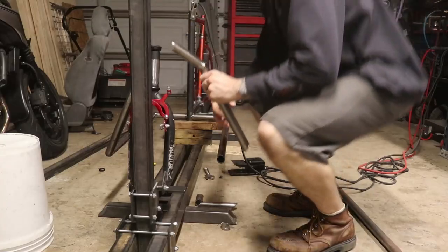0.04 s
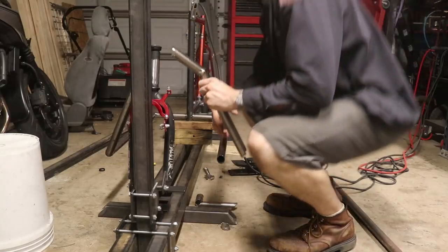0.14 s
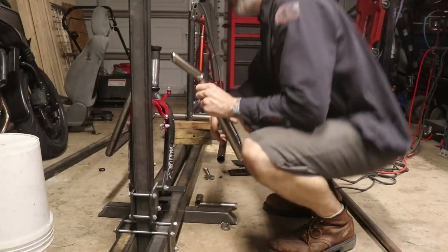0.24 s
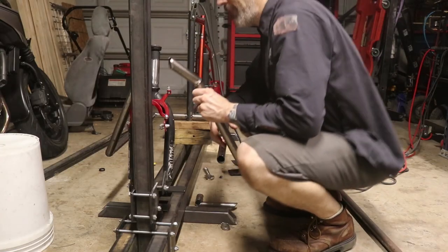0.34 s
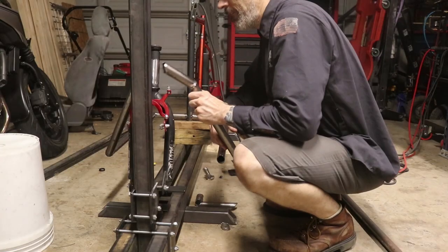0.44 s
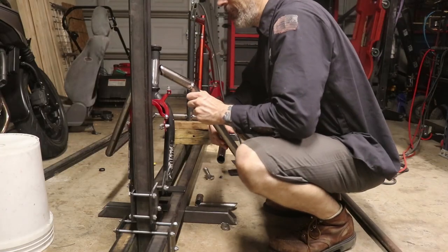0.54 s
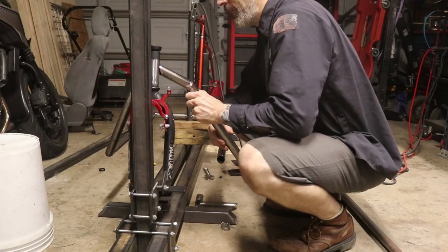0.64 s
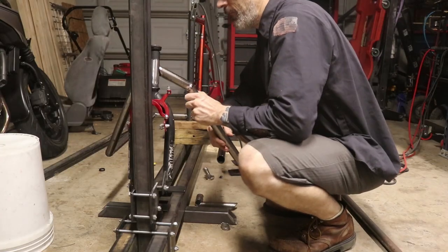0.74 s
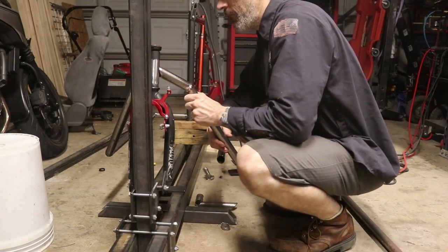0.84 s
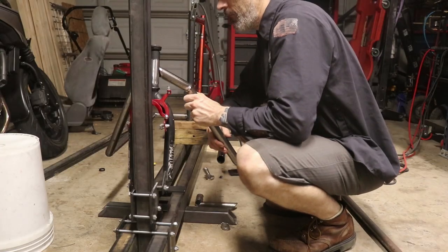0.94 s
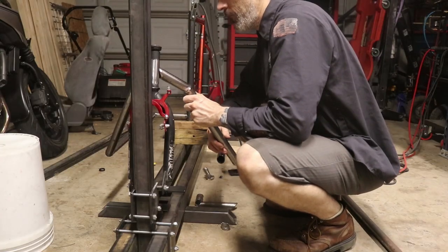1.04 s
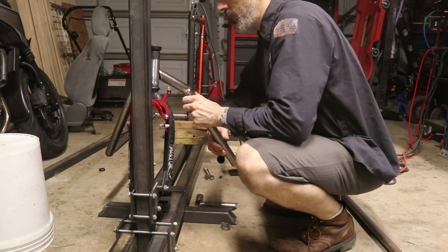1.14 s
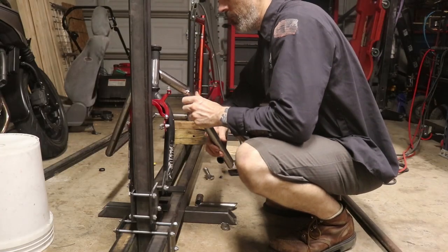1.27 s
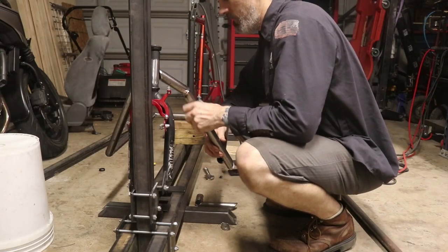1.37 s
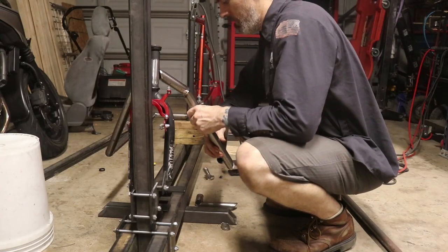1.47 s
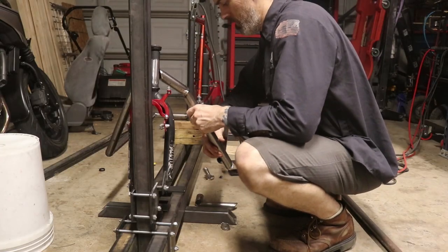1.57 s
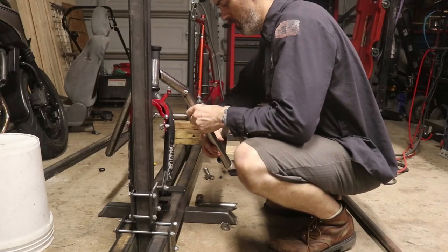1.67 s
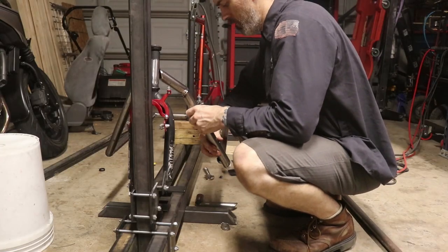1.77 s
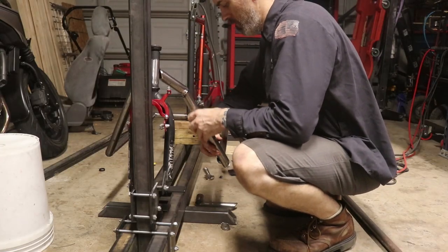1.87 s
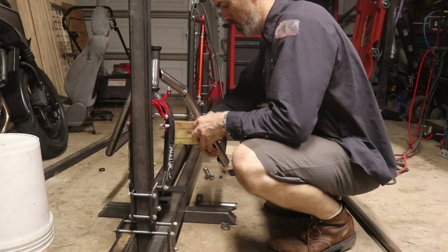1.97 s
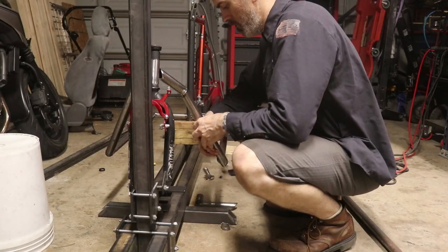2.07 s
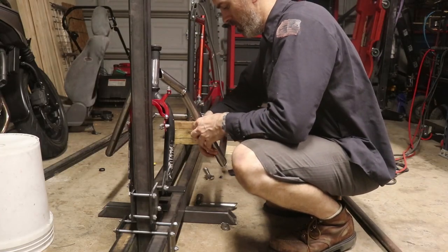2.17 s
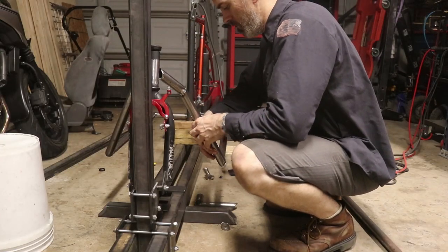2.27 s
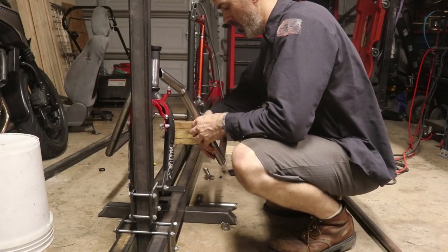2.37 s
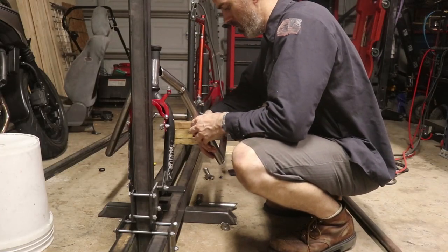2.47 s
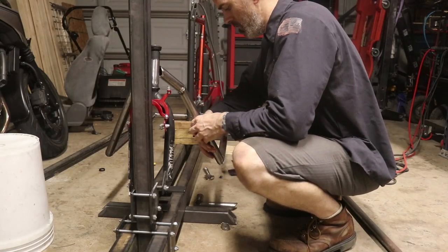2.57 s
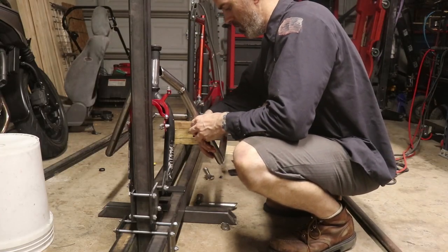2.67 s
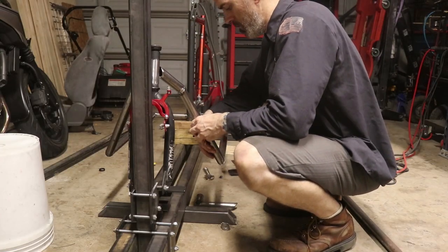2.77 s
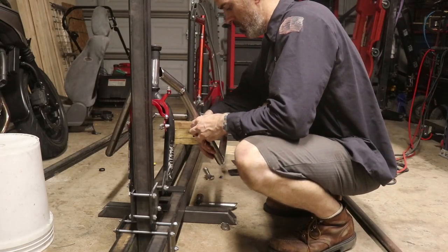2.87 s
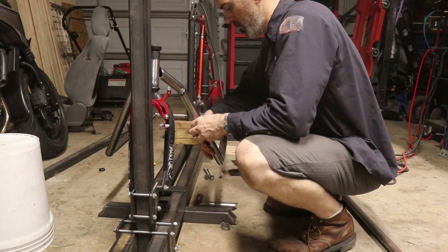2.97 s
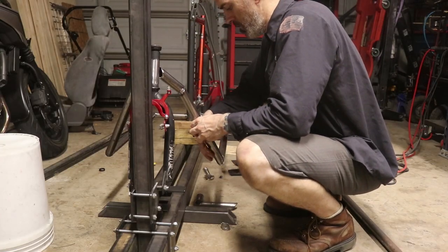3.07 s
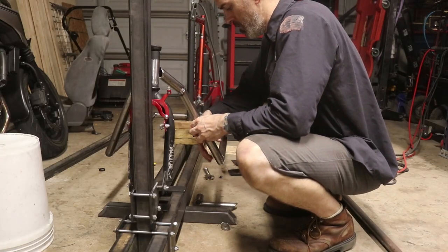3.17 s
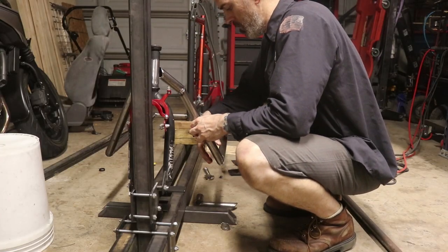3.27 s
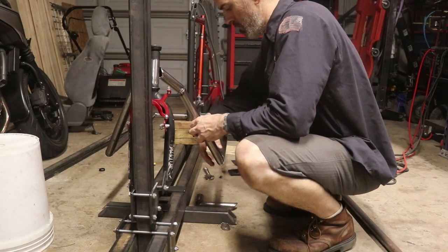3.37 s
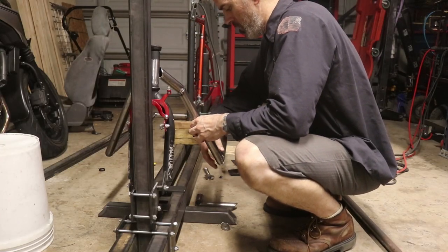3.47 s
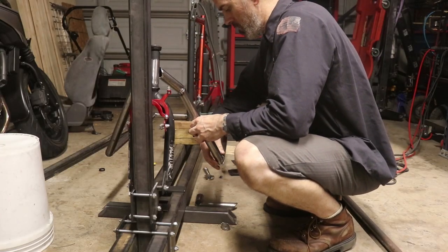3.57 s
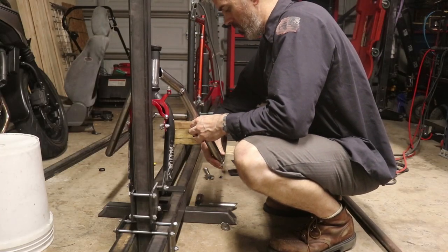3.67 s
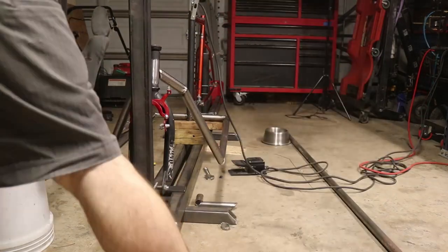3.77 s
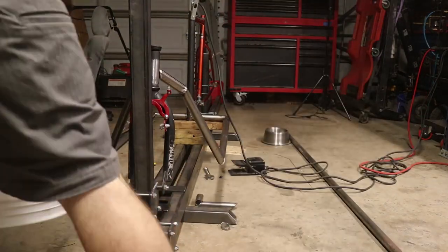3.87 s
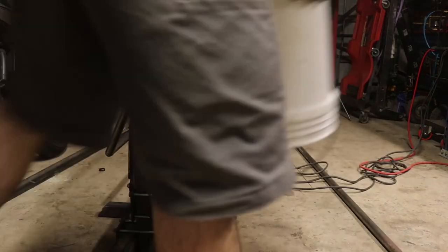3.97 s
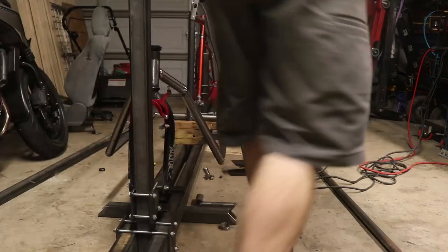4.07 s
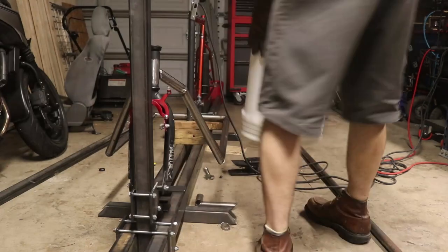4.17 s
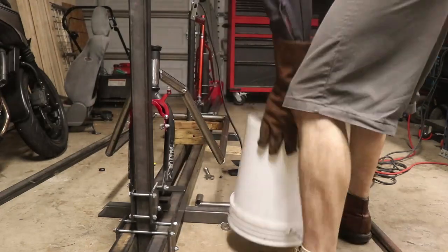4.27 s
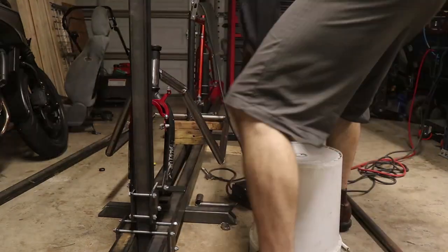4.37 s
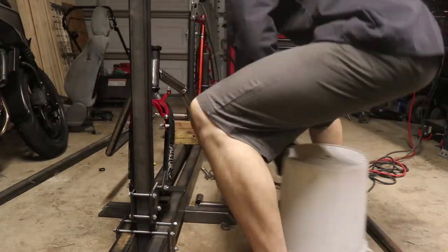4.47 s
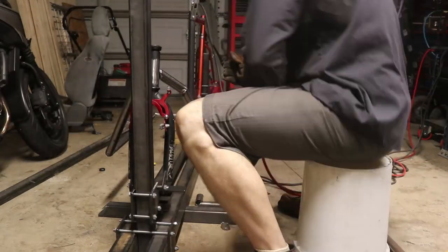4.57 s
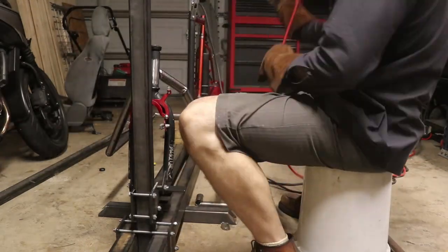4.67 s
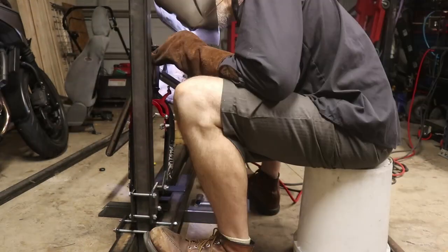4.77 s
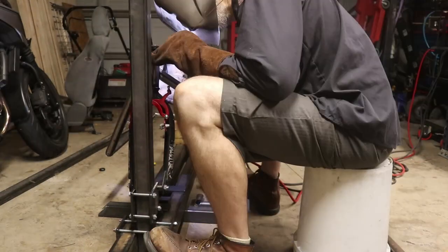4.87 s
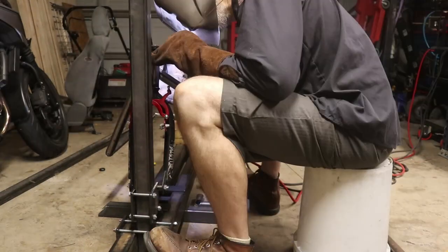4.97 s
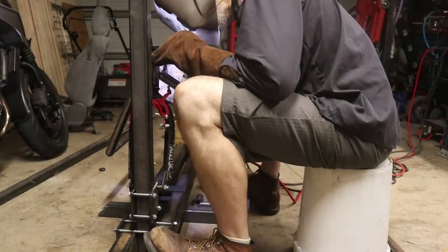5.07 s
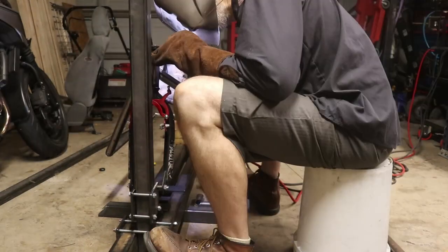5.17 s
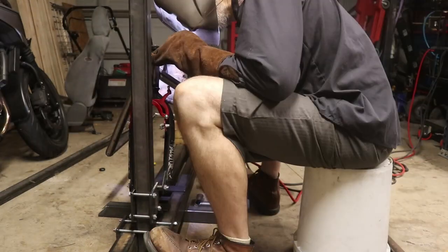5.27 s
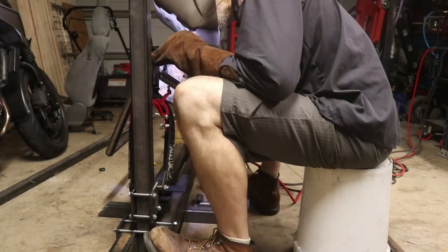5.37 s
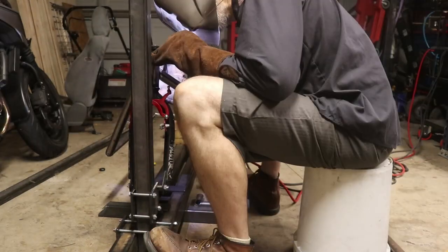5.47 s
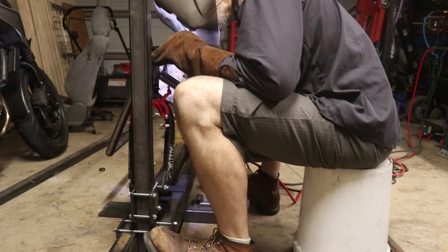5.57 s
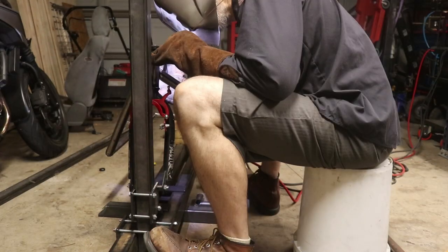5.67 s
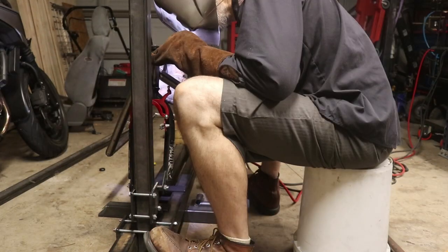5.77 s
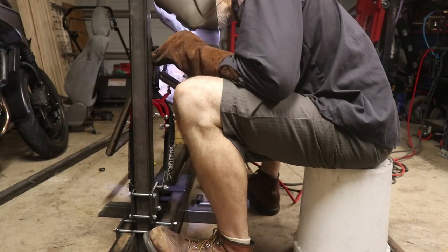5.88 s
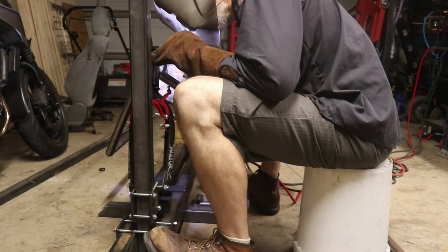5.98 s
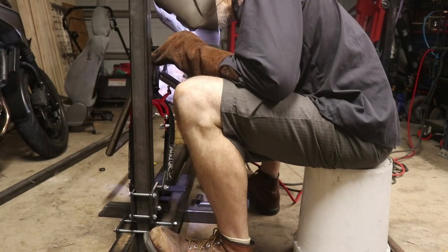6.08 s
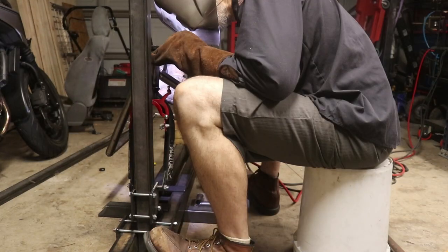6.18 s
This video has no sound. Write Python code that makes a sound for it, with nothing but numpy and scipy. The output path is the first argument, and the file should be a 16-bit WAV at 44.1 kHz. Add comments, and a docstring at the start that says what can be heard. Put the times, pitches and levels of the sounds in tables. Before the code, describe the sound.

Quiet garage air with faint hum. Sleeves rustle as a man crouches; a steel tube knocks hard on a frame, rings, scrapes briefly, then taps more softly. A hard cut brings a second of fast-forward: high fan whistle, short bumps, a plastic bucket juddering and booming. Another cut returns to normal speed, a low fan roar, and at the very end an arc spits and crackles. Camera microphone, mild room reverberation.

```python
"""Sleeves rustle in a still garage with faint mains hum; a steel tube knocks, slides and rings on a frame.
Then about a second runs in fast-forward, seven times as quick and as high: the welder's fan whistles
over bumps, and a plastic bucket is dragged over the concrete and set down.
Back at normal speed the fan roars on, and the arc strikes and crackles.
Noise is filtered into air, cloth, frame and sparks; decaying sines ring the tube and bucket."""
import sys
import numpy as np
from scipy import signal
from scipy.fft import rfft, irfft, next_fast_len
from scipy.io import wavfile
from scipy.ndimage import uniform_filter1d, map_coordinates

SR = 44100
rng = np.random.default_rng(int(sys.argv[2]) if len(sys.argv) > 2 else 0)


def generate_wav(sig):
    """Save sig (samples, or channels by samples) to the path in sys.argv[1] as 16-bit PCM at SR."""
    pcm = np.round(np.clip(np.atleast_2d(sig).T, -1, 1) * 32767).astype(np.int16)
    wavfile.write(sys.argv[1], SR, pcm)


N = 274302


def amp(db):
    """Decibels to gain."""
    return 10 ** (np.asarray(db) / 20)


def unit(x):
    """Scaled to rms 1."""
    return x / np.sqrt(np.mean(x ** 2) + 1e-20)


def clock():
    """The time of every sample in seconds."""
    return np.arange(N) / SR


def along(points, hz):
    """(Hz, value) points read on a log frequency axis."""
    f, v = np.transpose(points)
    return np.interp(np.log(hz + 1), np.log(f + 1), v)


def level(rows, outside=None):
    """Gain per sample from (s, dB) rows."""
    s, db = np.transpose(rows)
    return amp(np.interp(clock(), s, db, left=outside, right=outside))


def wobble(rate):
    """A smooth random curve with the given number of knots a second."""
    knots = rng.standard_normal(int(N * rate / SR) + 4)
    return map_coordinates(knots, [clock() * rate])


SWELL_SHAPE = 1.42  # 1 is a pointed peak, 2 a round one


def swell(s, db, rise_s, fall_s):
    """Gain of one stroke: it grows by 20 dB over its rise to a height at s, and loses 20 dB over its fall."""
    t = clock() - s
    span_s = np.where(t < 0, rise_s, fall_s)
    return amp(db - 20 * np.abs(t / span_s) ** SWELL_SHAPE)


def coloured(x, points, speed=1):
    """x through the causal minimum-phase filter with the given (Hz, dB) points, played at a speed."""
    m = 2 * next_fast_len(len(x) // 2 + 4096)
    hz = np.fft.rfftfreq(m, 1 / SR) / speed
    cepstrum = irfft(np.log(amp(along(points, hz))))
    # folding the cepstrum onto positive time makes the filter causal
    cepstrum[1:m // 2] *= 2
    cepstrum[m // 2 + 1:] = 0
    return irfft(rfft(x, m) * np.exp(rfft(cepstrum)), m)[:len(x)]


def grains(rate, spread_db):
    """Randomly timed tiny impulses of uneven size, about rate a second, rms 1."""
    sizes = rng.standard_normal(N) * amp(spread_db * np.clip(rng.standard_normal(N), -2, 2))
    return unit(sizes * (rng.random(N) < rate / SR))


def tone(hz, drift, rate):
    """A slightly unsteady sine of rms 1."""
    cycles = np.cumsum(hz * (1 + drift * wobble(rate))) / SR
    return np.sqrt(2) * np.sin(2 * np.pi * (cycles + rng.random()))


def add(track, s, sound):
    """Mix a sound in at a time."""
    part = track[round(s * SR):][:len(sound)]
    part += sound[:len(part)]


# The garage's reverberation. Each row: frequency in Hz, time to die by 60 dB in seconds.
GARAGE_T60 = [(200, 0.69), (1000, 0.66), (4000, 0.48), (12000, 0.23)]


def garage(x, wet_db, speed=1):
    """x with a fresh diffuse answer of the garage, whose treble dies first; fast-forward shortens it."""
    hz, t, z = signal.stft(rng.standard_normal(SR), SR, nperseg=256)
    t60 = along(GARAGE_T60, hz / speed)[:, None]
    tail = signal.istft(z * amp(-60 * t * speed / t60), SR, nperseg=256)[1]
    answer = amp(wet_db) * tail / np.linalg.norm(tail)
    answer[0] += 1  # the direct sound
    return signal.fftconvolve(x, answer / np.linalg.norm(answer))[:len(x)]


# Colour of a faint wide hiss. Each row: frequency in Hz, density in dB per Hz.
HISS_COLOUR = [(25, -4), (120, 2), (1200, -9), (2400, -12), (5000, -10), (9000, -4.5), (13000, -3),
               (15800, -2.5)]


def wide_hiss():
    """A faint hiss, filtered noise that is different in each ear."""
    return amp(-61) * unit(np.array([coloured(rng.standard_normal(N), HISS_COLOUR) for ear in range(2)]))


# Colour of the still air in the garage. Each row: frequency in Hz, density in dB per Hz.
AIR_COLOUR = [(15, -29), (25, -15.5), (123, -2.5), (241, -12), (299, -12), (382, -19), (1430, -28.5),
              (2090, -28), (2390, -27.5), (4570, -29.5), (5670, -30.5), (12400, -35.5), (15800, -40)]
# Mains hum. Each row: frequency in Hz, level in dB.
HUM_LINES = [(119, -72), (241, -65.5)]


def background():
    """Still garage air as filtered noise, and a faint mains hum as unsteady sines."""
    air = amp(-55.0) * unit(coloured(rng.standard_normal(N), AIR_COLOUR))
    hum = sum(amp(db) * tone(hz, drift=0.0029, rate=7.1) for hz, db in HUM_LINES)
    return air + hum


# A faint, thin squeal. Each row: time in seconds, frequency in Hz, level in dB.
SQUEAL_PATH = [(2.68, 11250, -72), (2.76, 11400, -67), (2.84, 11100, -79), (2.91, 11420, -65),
               (2.97, 11200, -72), (3.24, 9700, -80)]


def squeal():
    """A faint, thin tone that arches twice and glides down."""
    s, hz, db = np.transpose(SQUEAL_PATH)
    loudness = level(np.column_stack([s, db]), outside=-np.inf)
    return loudness * tone(np.interp(clock(), s, hz), drift=.002, rate=90)


# Sleeve movements. Each row: height in seconds, level in dB, rise in seconds, fall in seconds.
SLEEVE_STROKES = [(.01, -46, .1, 0.21), (.25, -46.5, 0.26, 0.39), (1.63, -47, .29, 0.32),
                  (1.96, -63, .05, .08), (3.17, -58.5, 0.065, .12)]
# Colour of rustling cloth. Each row: frequency in Hz, density in dB per Hz.
CLOTH_COLOUR = [(200, -2.5), (500, 2), (900, -4.5), (1500, -2.5), (2100, -4), (2700, -3), (4800, -2.5),
                (8000, -8.5), (11000, -14), (15800, -14.5)]


def clothes():
    """Fibres catch and slip as the sleeves move, each catch a tiny impulse."""
    fibres = unit(garage(coloured(grains(rate=5000, spread_db=3), CLOTH_COLOUR), wet_db=-5.5))
    return fibres * np.linalg.norm([swell(*row) for row in SLEEVE_STROKES], axis=0)


# The tube's modes. Each row: frequency in Hz, level in dB, time to die by 60 dB in seconds.
TUBE_MODES = [(277, -10.5, 0.81), (447, -7.5, 0.78), (497, -7, 0.54), (856, -7, 0.49), (1012, -4, 0.59),
              (1085, -6.5, 0.42), (1319, -24, 0.6), (1556, -9.5, 0.49), (1879, -3, 0.27), (1890, -15, 0.62),
              (2570, -5, 0.14), (3540, -11, 0.23), (4360, -9, 0.3), (4900, -17, .5), (4630, -16, 0.71),
              (5730, -21.5, 0.48), (7600, -23, 0.38)]


def steel(favoured_hz, boost_db):
    """One ring of the tube; the contact spot drives one mode harder than the rest."""
    t = np.arange(SR) / SR
    hz, db, t60 = np.transpose(TUBE_MODES)[:, :, None]
    gap = np.abs(hz - favoured_hz)
    db = db + boost_db * (gap == gap.min()) + rng.standard_normal(hz.shape)
    modes = amp(db - 60 * t / t60) * np.sin(2 * np.pi * (hz * t + rng.random(hz.shape)))
    onset = 1 - np.exp(-t / 0.00039)
    return np.sum(modes, axis=0) * onset


# Colour of the clamped frame. Each row: frequency in Hz, density in dB per Hz.
FRAME_COLOUR = [(60, -30), (160, -13), (280, -6), (430, 3), (650, -5.5), (950, -2.5), (1400, -2.5),
                (1900, -3), (2200, -12), (3000, -14), (4500, -9.5), (6500, -18), (15000, -31.5)]
# The tube sliding on the frame. Each row: height in seconds, level in dB, rise in seconds, fall in seconds,
# mode driven hardest in Hz, ring against rub in dB, bass in dB, treble in dB.
TUBE_SLIDES = [(1.135, -35, 0.057, 0.078, 1879, 5, -2, 1), (1.18, -36.5, 0.11, 0.058, 1879, 2, 1, 2),
               (2.495, -44, 0.08, 0.15, 497, -3, 7.5, 2)]


def slides():
    """Steel sticks and slips on steel, feeding the tube's modes and the frame."""
    out = np.zeros(N)
    for s, db, rise_s, fall_s, favoured_hz, ring_db, bass_db, treble_db in TUBE_SLIDES:
        slips = grains(rate=2000, spread_db=2.5)
        ring = unit(signal.fftconvolve(slips, steel(favoured_hz, boost_db=3.5))[:N])
        rub = unit(coloured(slips, FRAME_COLOUR))
        balance = [(600, bass_db), (1200, 0), (2000, 0), (4500, treble_db)]
        scrape = coloured(amp(ring_db) * ring + rub, balance)
        out += swell(s, db, rise_s, fall_s) * unit(scrape)
    return garage(out, wet_db=-5.0)


# Tube against frame. Each row: start in seconds, level in dB, treble in dB, dry tick in dB,
# mode driven hardest in Hz, its boost in dB.
TUBE_KNOCKS = [(.643, -19.5, 0.5, -8, 1556, 16), (.837, -16, -4, -20, 1879, 6),
               (1.182, -22, -16, -16, 1012, 6.5), (2.208, -52.5, 8.5, -10, 1879, 7),
               (2.812, -31.5, -4, -8, 856, 5.5), (2.984, -35.5, 1.5, 9.5, 497, 3.5),
               (3.320, -41, -0.5, -9, 1085, 13)]
NEUTRAL_KNOCK_DB, DULLING = -25, 0.54  # a softer knock has more bass: dB of bass per dB below the neutral one
REBOUND_S, REBOUND_DB = .033, -10.5  # the tube touches once more after each knock


def knocks():
    """Each contact ticks, clunks through the frame into the room, rebounds and leaves the tube ringing."""
    out, t = np.zeros(N), np.arange(SR) / SR
    tick_colour = [(500, -8), (2000, 3), (5500, 6), (12000, -17)]
    for s, db, treble_db, tick_db, favoured_hz, boost_db in TUBE_KNOCKS:
        contact = amp(-60 * t / 0.036)
        add(contact, REBOUND_S, amp(REBOUND_DB) * contact)
        blow = coloured(rng.standard_normal(SR) * contact, FRAME_COLOUR)
        clunk = amp(-26.5) * unit(garage(blow, wet_db=11.0))
        ring = amp(-14.5) * steel(favoured_hz, boost_db)
        tick = amp(tick_db - 12 - 60 * t / .012) * coloured(rng.standard_normal(SR), tick_colour)
        bass_db = DULLING * (NEUTRAL_KNOCK_DB - db)
        balance = [(450, bass_db), (1200, 0), (2000, 0), (4500, treble_db)]
        add(out, s, amp(db) * (tick + coloured(clunk + ring, balance)))
    return out


# The fan's blade tone at the crest of its swells. Each row: time in seconds, level in dB.
BLADE_CRESTS = [(3.78, -32.5), (3.95, -30), (4.22, -25), (4.37, -29), (4.45, -26.5), (4.95, -33.5),
                (5.4, -30), (6.0, -25.5)]
# As the worker moves about, an echo of the tone turns in phase and nearly cancels it.
# Each entry: moment of cancelling in seconds.
BLADE_FADES = [3.7, 3.88, 4.005, 4.092, 4.178, 4.265, 4.35, 4.397, 4.575, 4.78, 4.89, 5.21, 6.7]
BLADE_ECHO = 0.69  # strength of that echo over the direct tone


def blade_gain():
    """The blade tone and its echo add up and cancel in turn, one turn of phase from fade to fade."""
    turns = np.interp(clock(), np.sort(BLADE_FADES), np.arange(len(BLADE_FADES)))
    direct_and_echo = np.abs(1 - BLADE_ECHO * np.exp(2j * np.pi * turns))
    return level(BLADE_CRESTS) * direct_and_echo / (1 + BLADE_ECHO)


# Colour of the fan's rush at normal speed. Each row: frequency in Hz, density in dB per Hz.
FAN_COLOUR = [(25, -51.5), (45, -32), (70, -20), (110, -18), (160, -9), (260, 1.5), (350, -5), (430, -7),
              (560, -5.5), (1100, -9), (1600, -10.5), (1800, -14), (4400, -18.5), (7000, -31),
              (15000, -49.5)]
# Motor and casing at normal speed. Each row: frequency in Hz, level in dB.
MOTOR_LINES = [(47, -70), (194, -66), (282, -49.5), (333, -45), (391, -53.5), (840, -45), (1055, -45)]


def fan(speed, rush_db):
    """The welder's fan: turbulent air combed by the room, a blade tone with its octave, weaker motor lines."""
    turbulence = coloured(rng.standard_normal(N), FAN_COLOUR, speed)
    air = unit(garage(turbulence, wet_db=-7.5, speed=speed)) * amp(rush_db + 0.27 * wobble(9.9))
    blade_hz = 516.6 * speed
    whistle = blade_gain() * tone(blade_hz, drift=0.001585, rate=8 * speed)
    octave = amp(-45.5 + 2.5 * wobble(3 * speed)) * tone(2 * blade_hz, drift=.002, rate=8 * speed)
    motor = sum(amp(db + 4.2 * wobble(5 * speed)) * tone(hz * speed, drift=.01, rate=15 * speed)
                for hz, db in MOTOR_LINES)
    return air + whistle + octave + motor


# Bumps as heard in fast-forward. Each row: start in seconds, level in dB, centre in Hz,
# clatter against pock in dB.
HURRIED_BUMPS = [(3.867, -6, 804, -2.5), (4.156, -15.5, 1550, -25), (4.298, -20.5, 1070, -16),
                 (4.347, -7.5, 1440, 5.5), (4.363, -20, 1060, 10.5), (4.413, -16, 1220, -16),
                 (4.43, -19, 1320, -17), (4.668, -18, 860, -19), (4.701, -22, 970, 6.5)]


def bumps():
    """Steps and handling, shrunk by the fast-forward to short pocks with a bright clatter."""
    out, t = np.zeros(N), np.arange(SR // 4) / SR
    decay = amp(-60 * t / 0.062)
    clatter_colour = [(500, -28), (2000, -3.5), (9000, 7), (15000, -2.5)]
    for s, db, hz, clatter_db in HURRIED_BUMPS:
        pock_colour = [(hz / 3, -35), (hz / 1.43, 0), (hz * 1.48, 0), (hz * 2, -18), (hz * 8, -45)]
        pock = unit(decay * coloured(rng.standard_normal(len(t)), pock_colour))
        clatter = unit(decay * coloured(rng.standard_normal(len(t)), clatter_colour))
        add(out, s, amp(db - 9) * np.std(decay) * (pock + amp(clatter_db) * clatter))
    return out


# The bucket's judders over the concrete. Each row: height in seconds, level in dB.
JUDDERS = [(4.502, -29.5), (4.535, -13), (4.556, -16), (4.581, -14.5)]
# Colour of the dragging in fast-forward. Each row: frequency in Hz, density in dB per Hz.
JUDDER_COLOUR = [(180, -86), (300, -51), (545, -13), (747, -4), (839, -11), (1060, 2), (1190, 1),
                 (1360, -12), (1660, -35), (3320, -13.5), (4950, -49), (5380, -12.5), (7010, -18),
                 (11500, -16), (15800, -27.5)]
# The bucket's modes in fast-forward. Each row: frequency in Hz, level in dB, time to die by 60 dB in seconds.
BUCKET_MODES = [(692, -31, 0.17), (1170, -4.5, 0.052), (1320, -10, 0.017), (2510, -14.5, 0.018)]
SET_DOWN_S = 4.6098  # the bucket takes the weight


def bucket():
    """The plastic bucket judders over the concrete, then booms once as it is sat on."""
    strokes = [swell(s, db, rise_s=0.024, fall_s=0.026) for s, db in JUDDERS]
    scraping = unit(coloured(grains(rate=9000, spread_db=1.5), JUDDER_COLOUR))
    out = np.linalg.norm(strokes, axis=0) * scraping
    t = np.arange(SR // 4) / SR
    boom = sum(amp(db - 60 * t / t60) * np.sin(2 * np.pi * hz * t) for hz, db, t60 in BUCKET_MODES)
    add(out, SET_DOWN_S, boom)
    return out


# The arc's loudest spits. Each row: start in seconds, level in dB before the colouring.
ARC_SPITS = [(6.1285, -11.5), (6.1475, -12.5), (6.171, -14.5)]
# Colour of the arc. Each row: frequency in Hz, density in dB per Hz.
ARC_COLOUR = [(100, -47), (1100, -1.5), (1500, -19), (1900, 1.5), (2400, -13), (4000, -1.5), (4900, -19),
              (6200, -9), (7700, -21), (9300, -10.5), (11300, -25), (12050, -11), (12900, -35),
              (15600, -22)]
ARC_START_S, SIZZLE_DB = 6.128, -28  # the sizzle runs on from the strike; its level is before the colouring


def arc():
    """The wire shorts and bursts: a few hard spits over a dense sizzle of sparks."""
    sparks = amp(SIZZLE_DB) * (clock() > ARC_START_S) * grains(rate=2600, spread_db=8)
    t = np.arange(SR // 10) / SR
    for s, db in ARC_SPITS:
        add(sparks, s, amp(db - 60 * t / 0.03) * rng.standard_normal(len(t)))
    heard = garage(coloured(sparks, ARC_COLOUR), wet_db=-4)
    return np.std(sparks) * amp(0.7) * unit(heard)


CUT_IN_S, CUT_OUT_S, FAST = 3.776, 4.843, 7  # start and end of the fast-forward, and its speed factor


def scene():
    """Three stretches joined by hard cuts, the same in both ears but for a faint hiss."""
    t = clock()
    hiss = wide_hiss()
    fitting = background() + clothes() + knocks() + slides() + squeal() + hiss
    # fast-forward lifts the bumps and the bucket out of the bass
    low_cut = signal.butter(4, 450, "highpass", fs=SR, output="sos")
    handling = signal.sosfilt(low_cut, bumps() + bucket())
    hurried = fan(FAST, rush_db=-27.0) + handling + amp(-13) * hiss
    welding = fan(1, rush_db=-26.5) + arc() + hiss
    # each cut is a very short cross-fade
    before = uniform_filter1d((t < CUT_IN_S).astype(float), size=90)
    after = uniform_filter1d((t >= CUT_OUT_S).astype(float), size=90)
    return before * fitting + (1 - before - after) * hurried + after * welding


def record(dry):
    """The camera keeps nothing above its band limit."""
    top_hz = 15900
    m = next_fast_len(N + SR // 2)
    kept = np.fft.rfftfreq(m, 1 / SR) < top_hz
    return irfft(rfft(dry, m) * kept, m)[:, :N]


dry = scene()
out = record(dry)
generate_wav(out)
```